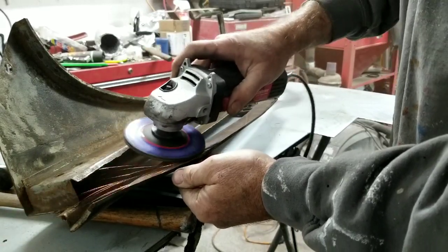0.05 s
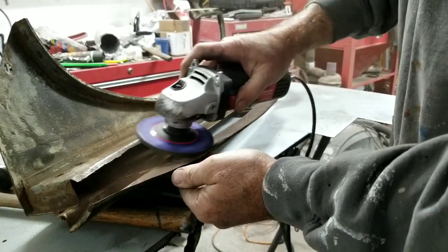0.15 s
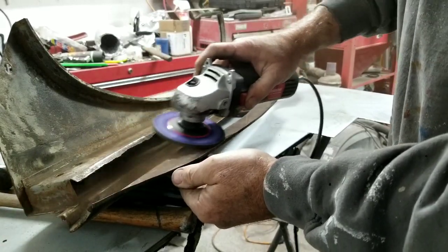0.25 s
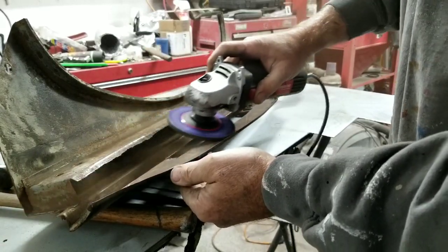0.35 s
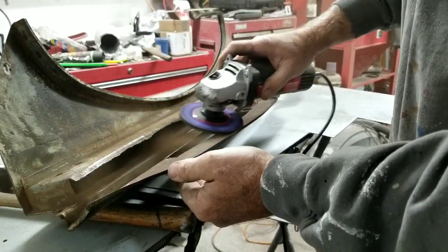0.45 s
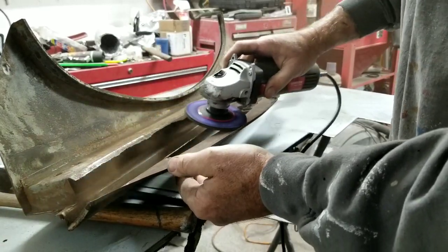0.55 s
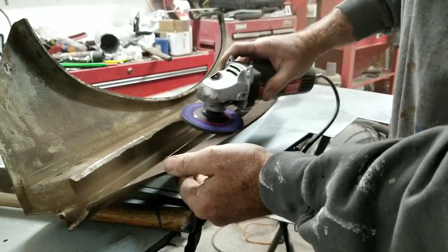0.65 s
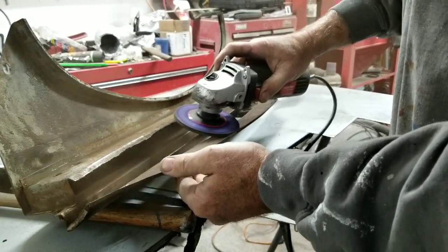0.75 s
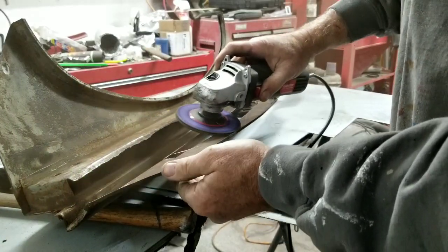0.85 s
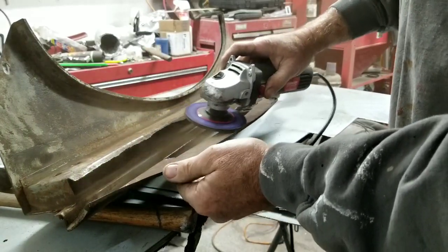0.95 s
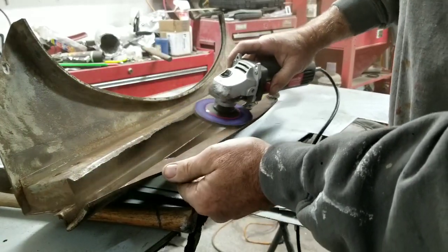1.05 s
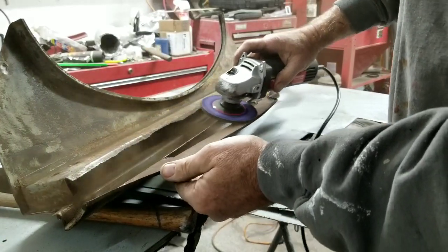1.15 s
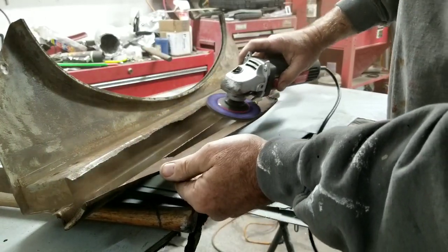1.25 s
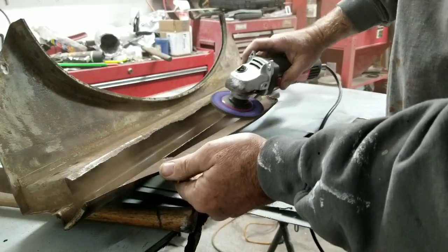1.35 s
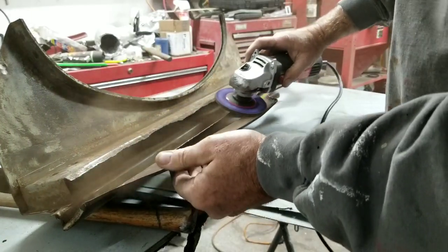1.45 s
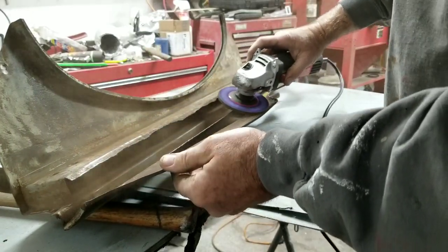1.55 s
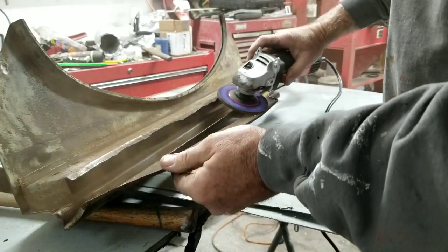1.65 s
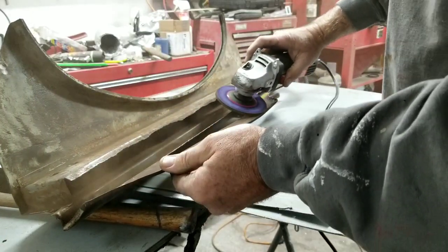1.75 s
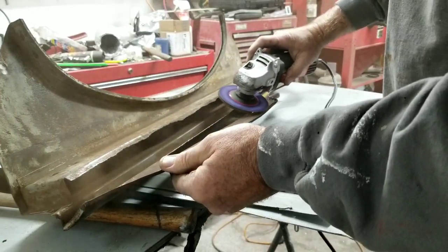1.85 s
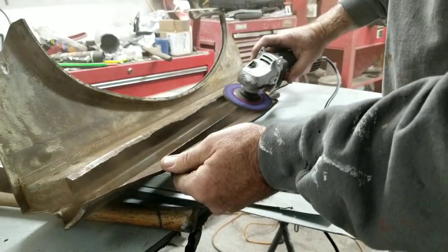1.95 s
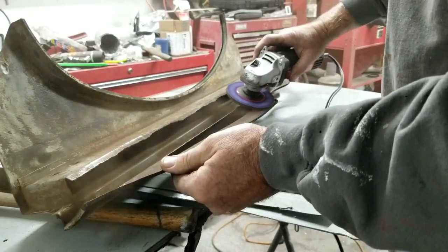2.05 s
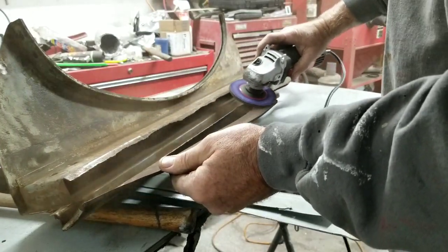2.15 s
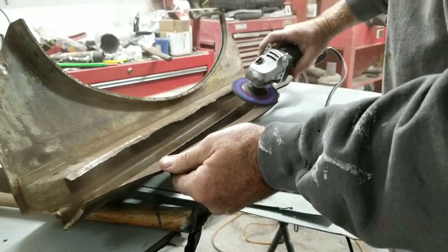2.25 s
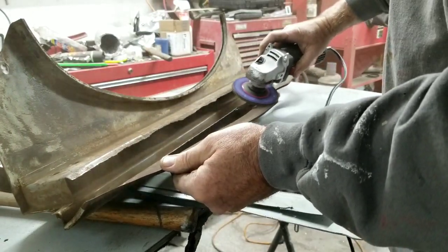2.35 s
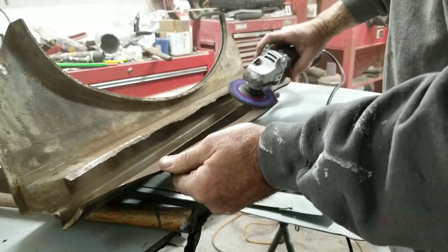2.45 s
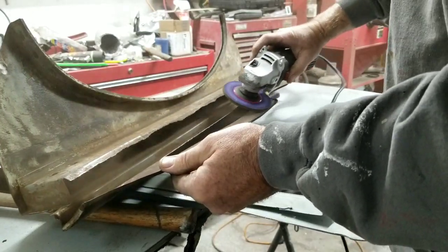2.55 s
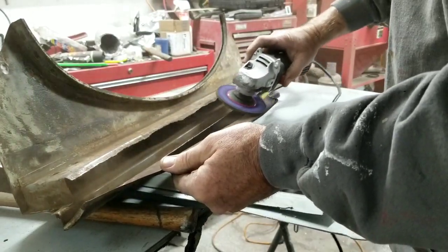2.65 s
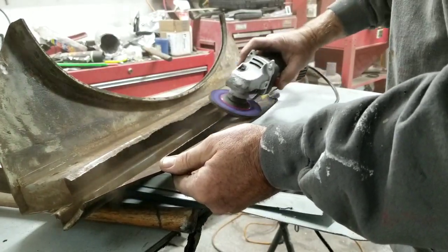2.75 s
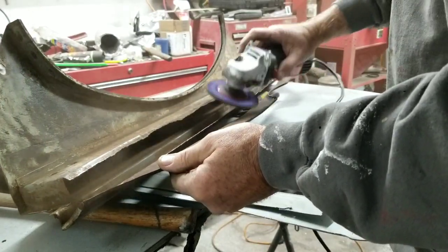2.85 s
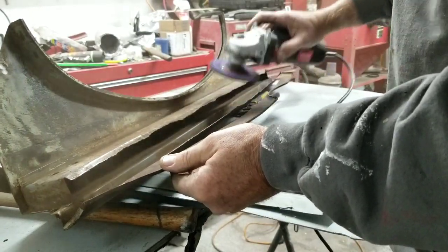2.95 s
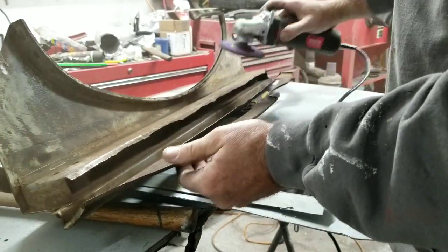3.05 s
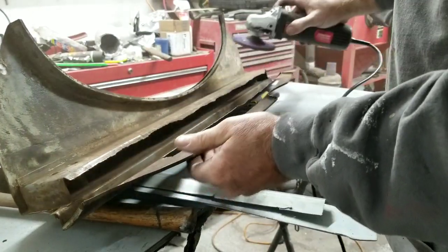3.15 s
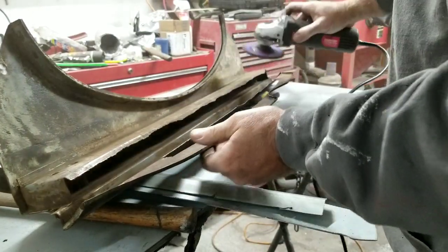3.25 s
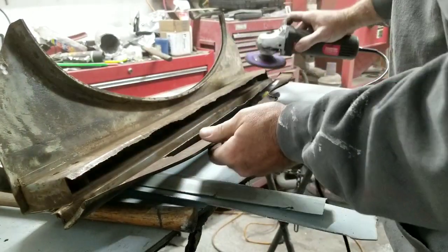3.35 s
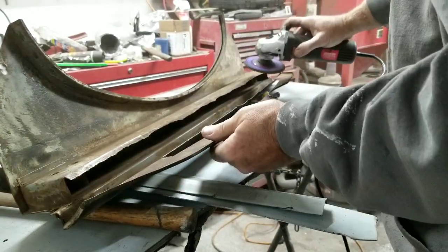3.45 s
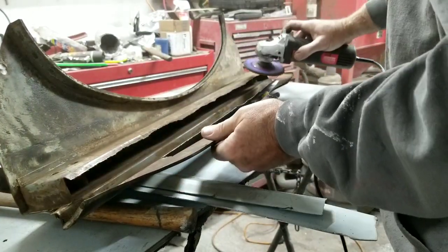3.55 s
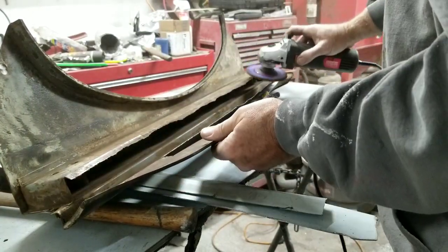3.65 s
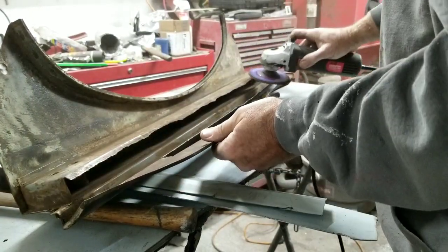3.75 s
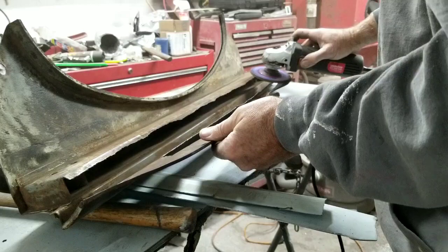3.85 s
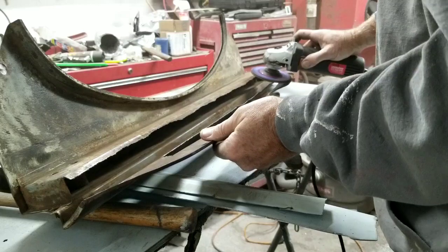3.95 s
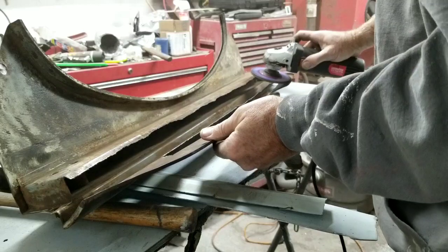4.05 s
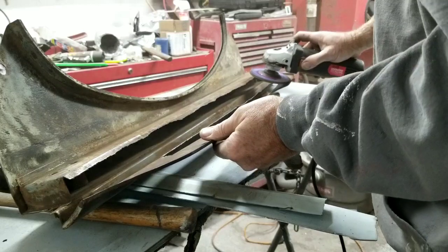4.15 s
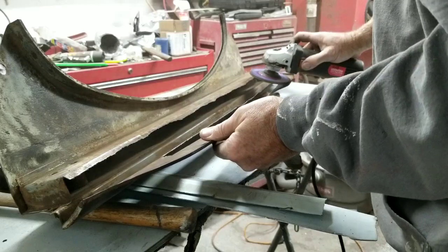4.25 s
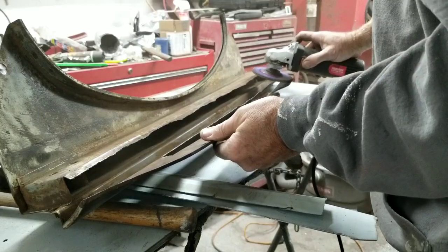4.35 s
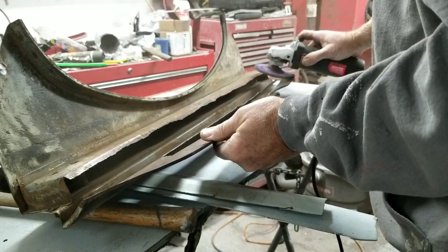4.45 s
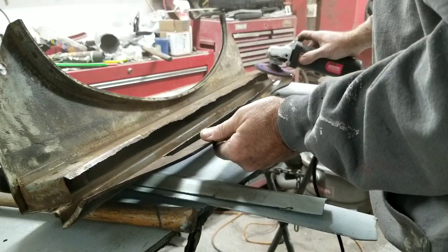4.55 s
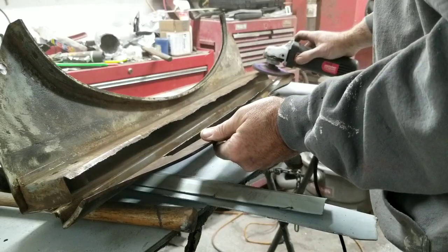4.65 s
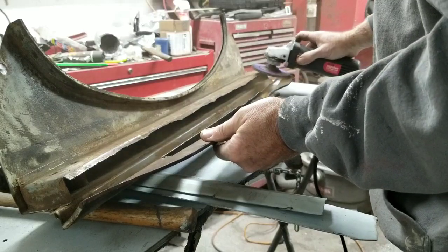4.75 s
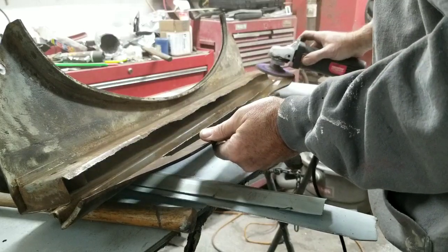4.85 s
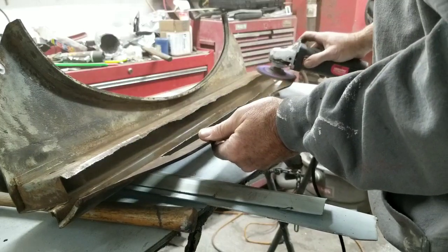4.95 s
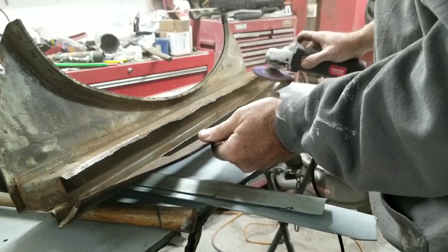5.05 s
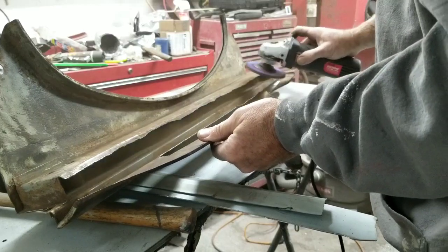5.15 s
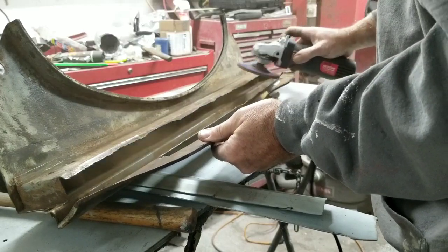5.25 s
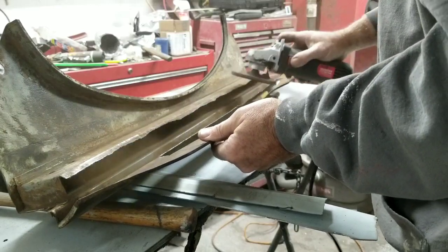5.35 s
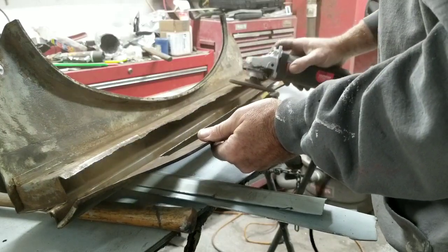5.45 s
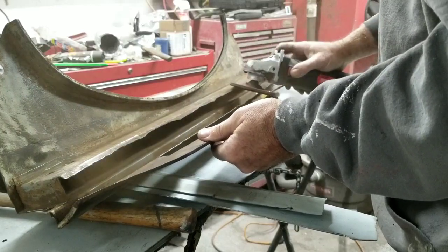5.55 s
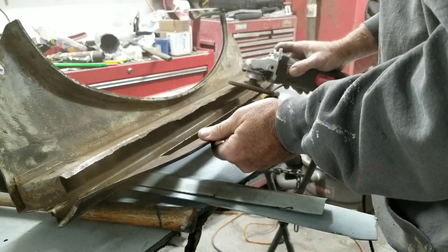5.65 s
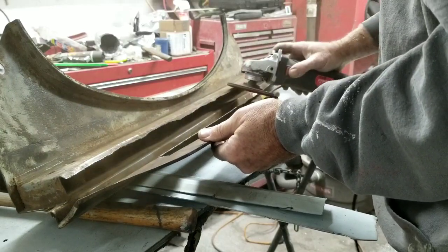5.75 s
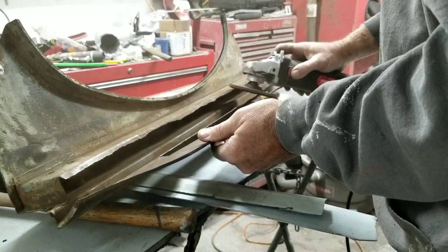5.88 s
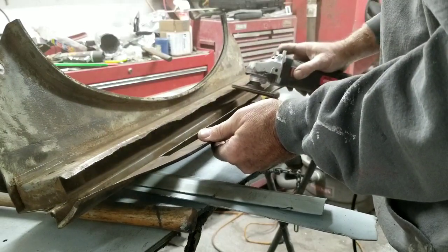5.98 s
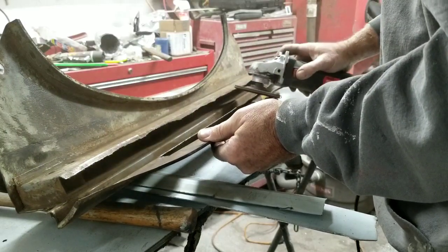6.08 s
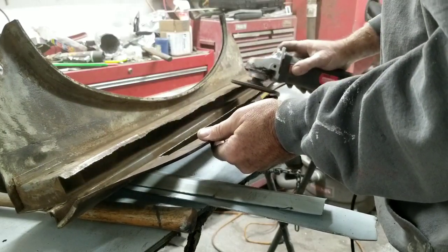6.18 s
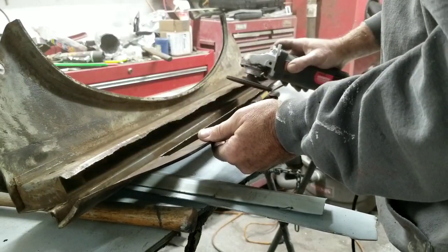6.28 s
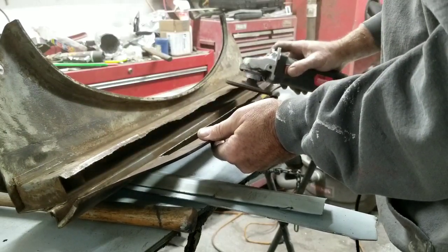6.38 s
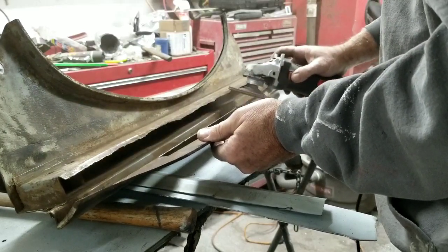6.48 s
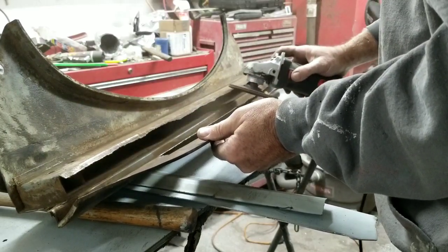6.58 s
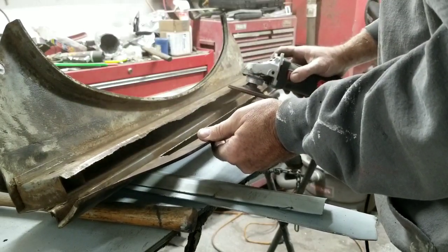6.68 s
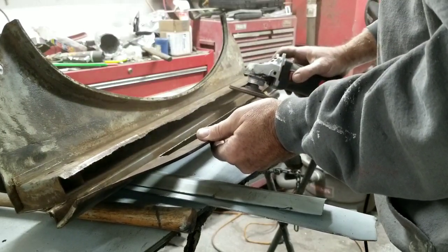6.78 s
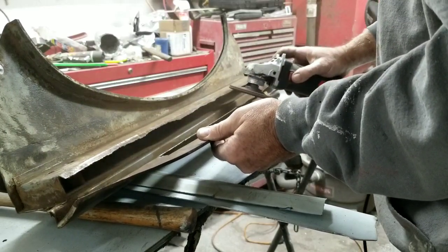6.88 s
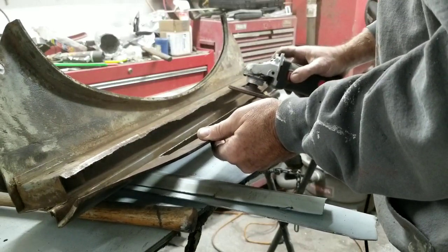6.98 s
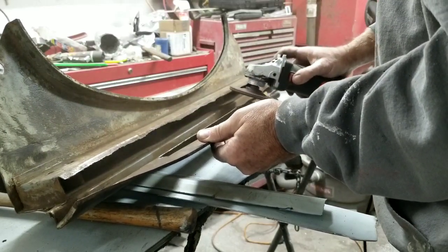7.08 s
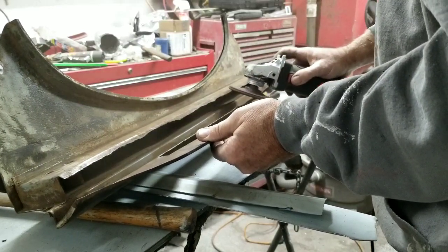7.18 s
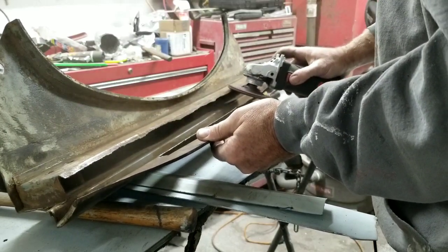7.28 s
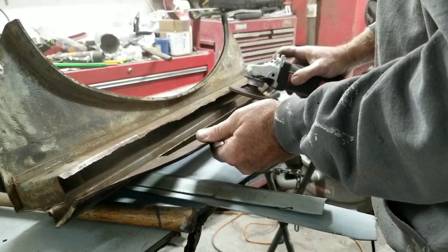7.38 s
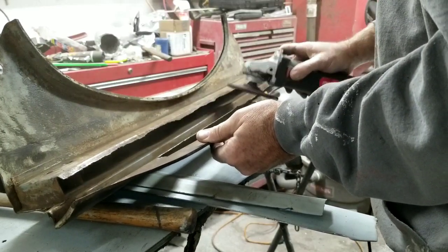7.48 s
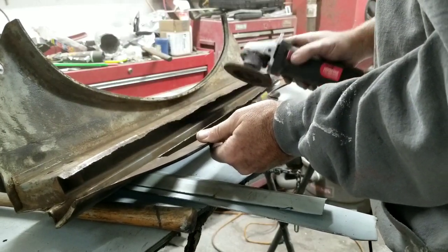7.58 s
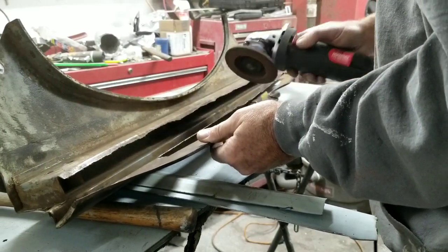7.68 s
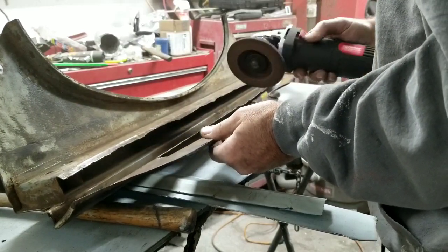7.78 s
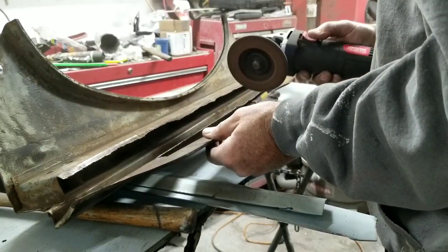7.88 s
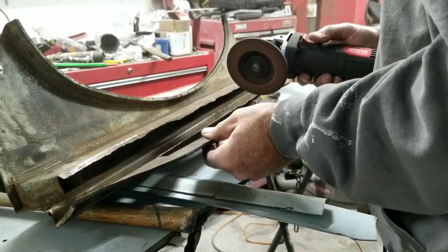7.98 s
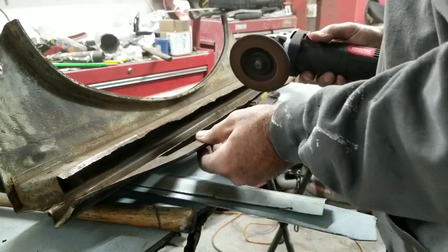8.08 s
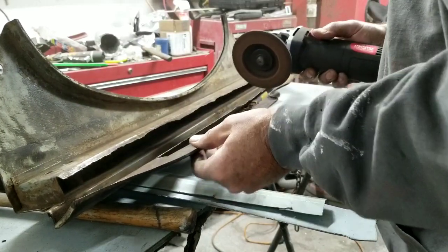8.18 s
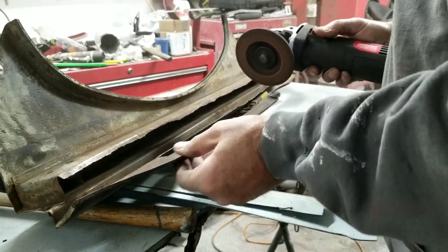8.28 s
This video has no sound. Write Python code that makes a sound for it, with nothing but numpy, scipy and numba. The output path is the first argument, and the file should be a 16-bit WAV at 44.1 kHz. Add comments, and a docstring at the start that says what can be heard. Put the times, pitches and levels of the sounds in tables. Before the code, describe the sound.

A corded angle grinder is already working on sheet steel at the start, close by in a workshop with a short echo. Its flap disc makes a harsh, bright, gritty screech over a motor whine and hissing air, while the sheet drones and thin ringing tones swell and fade. At about 2.9 seconds the disc lifts, and the free motor rises in pitch with a quieter hiss. Grinding returns from 3.8 to 5.2 seconds, dragging the pitch down. A brief touch comes at 5.6 seconds, and another runs from 5.8 to 6.3. The last pass, from 6.5 to 7.6 seconds, has several sharp flares of screeching as the disc bites. Then the motor is switched off and its whine falls, while the gears chatter in quick, irregular metallic ticks until the end at about 8.3 seconds.

```python
"""In a workshop, a corded angle grinder with a flap disc works along rusty sheet steel.
Each touch slows the motor, the grit screeches and the sheet drones and sings. The same grit comes
round on every turn, so the rubbing partly repeats. The spinning motor hums and its fan hisses.
Switched off, the motor runs down and the unloaded gears chatter. The room adds a short echo."""
import sys
import numpy as np
from scipy import signal
from scipy.fft import rfft, irfft, next_fast_len
from scipy.io import wavfile
from scipy.ndimage import uniform_filter1d, map_coordinates
from numba import njit

SR = 44100
rng = np.random.default_rng(int(sys.argv[2]) if len(sys.argv) > 2 else 0)


def digitize_waveform(pressure):
    """Quantize a signal to 16-bit integers and store it at the path in sys.argv[1].

    Rows of a 2-D input are taken as channels; values are limited to [-1, 1].
    """
    field = np.atleast_2d(pressure).T
    bounded = np.clip(field, -1, 1)
    quanta = np.round(bounded * 32767).astype(np.int16)
    wavfile.write(sys.argv[1], SR, quanta)


N = 366912
T = np.arange(N) / SR
FFT_SIZE = next_fast_len(N)
HZ = np.maximum(np.arange(FFT_SIZE // 2 + 1) * SR / FFT_SIZE, 1)


def grinding(rubbing):
    """The grit shakes the sheet: a screech and two drones follow the hand's pressure."""
    # the sheet's broad tone colour: (pitch [Hz], level [dB])
    colour = [(150, -58.5), (250, -54), (334, -63), (409, -15), (600, -26.5), (740, -33), (835, -17.5),
              (1260, -22.5), (1490, -19), (2520, -18), (3420, -22.5), (4810, -15), (7480, -16),
              (13300, -8.5), (14500, -11)]
    # ringing heard wherever the disc is: (pitch [Hz], width [Hz], level against the colour [dB])
    modes = [(9940, 310, -9), (10290, 53, 2.5), (10930, 150, -2), (11750, 96, -12), (14300, 700, 1),
             (13500, 110, 6)]
    ringing = np.sqrt(1 + peaks(modes) ** 2)
    sheet = stereo(rubbing, undb(over_hz(colour)) * ringing)
    sheet = rfft(patchy(sheet, slow_db=1.0, quick_db=3.8, own_db=2.6, bass_db=20), FFT_SIZE)
    low, high = 1 / (1 + (HZ / 3250) ** 16), 1 / (1 + (8200 / HZ) ** 16)
    bands = [unit(irfft(sheet * part, FFT_SIZE)[:, :N]) for part in (high, 1 - low - high, low)]
    hand_tremble = undb(np.outer((0.6, -0.55, 1.06), walk(24.8)))
    return sum(band * gain for band, gain in zip(bands, pressure() * hand_tremble))


def pressure():
    """Gains of screech, middle and low drone: the disc lands fast, presses and lifts more slowly."""
    # one list for each touch of the disc:
    # (time [s], screech [dB], middle drone against screech [dB], low drone against screech [dB])
    touches = [
        [(0, -18, -18, -19), (0.14, -23, -15.5, -21), (0.2, -19.5, -15, -20.5), (0.38, -17.5, -16, -19),
         (0.45, -20, -15.5, -20), (0.7, -21, -13.5, -21), (1.4, -20, -17, -21), (1.7, -24, -17.5, -26),
         (1.8, -21.5, -16, -20.5), (1.92, -23.5, -19.5, -22.5), (2.4, -20.5, -17, -24),
         (2.47, -21.5, -18.5, -20), (2.62, -21, -16.5, -21), (2.86, -22, -16, -19.5)],
        [(3.8, -27, -13, -13), (3.812, -20.5, -19.5, -21.5), (3.9, -25, -14, -14.5), (3.97, -22.5, -17.5, -17),
         (4.04, -21, -14, -13.5), (4.28, -19.5, -14, -18), (4.38, -21.5, -16.5, -17),
         (4.68, -21.5, -14.5, -18.5), (4.76, -24.5, -11, -18), (4.93, -22.5, -17, -19.5),
         (4.98, -23.5, -9.5, -9), (5.16, -23.5, -18.5, -19)],
        [(5.594, -19.5, -15.5, -19), (5.66, -20, -15, -26), (5.69, -24.5, -10.5, -18.5)],
        [(5.79, -19.5, -25, -28), (5.8, -20.5, -18, -21.5), (5.95, -23, -16, -21), (6.04, -27.5, -10.5, -19),
         (6.12, -23.5, -17.5, -15.5), (6.215, -23, -12.5, -21), (6.245, -26, -14, -13)],
        [(6.541, -18.5, -21.5, -26.5), (6.72, -24.5, -11.5, -15), (6.82, -22, -16.5, -22.5),
         (6.9, -22.5, -16.5, -20.5), (7.09, -25, -13.5, -19), (7.21, -23.5, -18.5, -20.5),
         (7.31, -22.5, -14.5, -19), (7.44, -24, -15, -18.5), (7.49, -22, -22.5, -27), (7.54, -19.5, -16, -20)],
    ]
    # the disc bites harder and the screech flares: (time [s], boost [dB])
    bites = [(0.75, 2), (2.39, 1), (2.69, 4), (4.694, 2), (5.026, 3), (6.748, 6), (6.88, 3), (7.02, 4),
             (7.157, 3.5), (7.247, 4.5)]
    land_db_per_s, lift_db_per_s, bite_s = 1808, 479, 0.029
    gains = np.zeros((3, N))
    for touch in touches:
        s, screech_db, middle_db, low_db = np.transpose(touch)
        edge_db = -land_db_per_s * np.maximum(s[0] - T, 0) - lift_db_per_s * np.maximum(T - s[-1], 0)
        for gain, db in zip(gains, (screech_db, screech_db + middle_db, screech_db + low_db)):
            gain += undb(np.interp(T, s, db) + edge_db)
    gains[0] *= undb(sum(db * np.exp(-((T - s) / bite_s) ** 2) for s, db in bites))
    return gains


def grit(smooth_hz):
    """Two rubbing spectra: some grit returns each turn; fresh grit throbs as the disc runs unevenly."""
    # rough steel makes the speed waver: (time [s], spread [share of speed])
    wobble = [(0, .001), (2.9, .001), (3.8, .003), (5.2, .004), (6.5, .007), (7.6, .007)]
    # returning grit against fresh grit: (pitch [Hz], level [dB])
    repeats = [(500, 16), (1500, 12), (2800, 9), (4500, 3), (8000, 2), (13000, -6)]
    carry_over, steady_share, multiples = .54, .28, 32
    disc_hz = smooth_hz * (1 + over_time(wobble) * walk(15))
    noise = rng.standard_normal((4, N))
    turns, lag = np.cumsum(disc_hz) / SR, SR / disc_hz
    # both the flaps and the track on the steel remember the last turn
    again = unit(np.array([repeat(repeat(x, lag, carry_over), lag, carry_over) for x in noise[:2]]))
    rim_band = HZ < multiples * disc_hz.min()
    rim = rfft(flaps(turns, disc_hz, multiples), FFT_SIZE)
    again = rfft(again, FFT_SIZE) * np.sqrt(1 - steady_share * rim_band) + np.sqrt(steady_share) * rim
    throb_db = 2.0 * np.sin(2 * np.pi * turns) + 0.84 * np.sin(4 * np.pi * turns + 2 * walk(11))
    # single flaps bite in bursts of a millisecond or two
    bite_db = 2.0 * unit(uniform_filter1d(rng.standard_normal(N), size=60))
    fresh = unit(noise[2:] * undb(throb_db + bite_db + 0.75 * walk(55)))
    share = 1 / (1 + undb(-over_hz(repeats)) ** 2)
    return np.sqrt(share) * again + np.sqrt(1 - share) * rfft(fresh, FFT_SIZE)


@njit
def repeat(x, lag, carry_over):
    """Feed the sound of one turn ago back in: the same grit meets the steel again."""
    y = np.zeros(len(x))
    for i in range(len(x)):
        at = i - lag[i]
        k = int(at)
        y[i] = x[i]
        if k > 0:
            y[i] += carry_over * (y[k] + (at - k) * (y[k + 1] - y[k]))
    return y


def flaps(turns, disc_hz, multiples):
    """The uneven rim strikes the same pattern every turn, making tones at multiples of the disc speed."""
    # how firmly the pattern holds: (time [s], level [dB])
    firmness = [(0, -3.5), (2.9, -8.5), (3.8, -3), (5.2, -9.5), (5.8, -1), (6.5, -25.5), (7.6, -18)]
    angle = np.arange(1024) / 1024
    orders, phases = np.arange(1, multiples + 1)[:, None], rng.random((2, multiples, 1))
    rims = np.sum(np.sin(2 * np.pi * (orders * angle + phases)), axis=1)
    tones = np.array([np.interp(turns, angle, rim, period=1) for rim in rims])
    return undb(over_time(firmness)) * 2 * np.sqrt(disc_hz / SR) * tones


def singing(rubbing):
    """One of the sheet's own notes swells while the disc rides its spot, then fades."""
    # the sheet's notes: (start [s], length [s], pitch [Hz], level [dB])
    notes = [(0.905, 0.49, 2333, -46.5), (1.238, 0.84, 2113, -50.5), (0.501, 0.63, 10050, -31.5),
             (1.29, 0.58, 9370, -43.5), (1.581, 0.12, 14300, -30), (2.054, 0.31, 1335, -51.5),
             (0.197, 0.66, 1095, -63), (1.05, 0.12, 1090, -47.5), (1.3, 0.44, 1067, -61),
             (2.05, 0.16, 1070, -49.5), (0.3, 0.55, 1474, -56), (4.01, 0.11, 2000, -44),
             (6.725, 0.12, 1725, -53.5), (7.004, 0.08, 1724, -59), (7.5, 0.08, 1720, -50),
             (2.326, 0.12, 11700, -32.5), (2.392, 0.48, 2480, -49), (2.514, 0.35, 2227, -43.5),
             (3.802, 0.1, 12840, -27), (4.105, 0.35, 1470, -48), (4.19, 0.14, 2815, -45),
             (4.398, 0.35, 10450, -41), (4.725, 0.25, 13900, -50), (4.732, 0.18, 10070, -35),
             (4.842, 0.25, 1550, -45), (6.101, 0.16, 13700, -50), (6.878, 0.58, 13580, -32.5)]
    drive, out = stereo(rubbing, 1), np.zeros((2, N))
    for s, length, hz, db in notes:
        span = slice(max(int((s - .03) * SR), 0), int((s + length + 0.045) * SR))
        width_hz = 50 + 0.006 * hz
        mode = signal.iirpeak(hz, hz / width_hz, SR)
        tone = unit(signal.lfilter(*mode, signal.lfilter(*mode, drive[:, span])))
        out[:, span] += undb(db) * tone * signal.windows.tukey(tone.shape[1], .6)
    return out


def low_notes(disc_hz):
    """Clean low tones at multiples of the disc speed come and go."""
    # a note at twice the disc speed: (start [s], length [s], level [dB])
    notes = [(0.493, 0.045, -57), (0.695, 0.052, -61), (0.843, 0.058, -58), (1.184, 0.062, -53),
             (1.34, 0.072, -60), (1.504, 0.054, -56), (1.78, 0.061, -57.5), (2.548, 0.036, -52),
             (2.926, 0.034, -65), (4.336, 0.053, -60), (4.422, 0.053, -47), (5.093, 0.14, -58.5),
             (5.467, 0.027, -61), (5.68, 0.082, -72), (6.028, 0.037, -62), (6.115, 0.045, -61),
             (6.202, 0.16, -65), (6.96, 0.055, -58), (7.153, 0.25, -65), (7.455, 0.03, -62),
             (7.53, 0.057, -72)]
    # tones that flicker during a touch: (multiple of disc speed, offset from the low drone [dB])
    flickers = [(4, -14), (5, -13), (6, -14), (8, -12), (10, -11)]
    angle = 2 * np.pi * np.cumsum(disc_hz) / SR
    swell = sum(undb(db) * np.exp(-((T - s - length / 2) / (length / 2)) ** 6) for s, length, db in notes)
    out = swell * undb(5.6 * walk(25)) * np.sin(2 * angle + walk(12))
    drone = pressure()[2]
    for order, db in flickers:
        flicker_db = 15 * (np.tanh(3 * walk(16)) - 1.5)
        out += drone * undb(db + flicker_db) * np.sin(order * angle + walk(5))
    return np.sqrt(2) * out


def motor(hz):
    """The off-balance rotor hums; odd multiples whine, the seventh most when the housing rings along."""
    # heard level of the hum and whine; at moments the hum is briefly lost: (time [s], hum [dB], whine at five
    # times the speed [dB])
    levels = [(0, -60, -69), (0.45, -55, -62), (0.63, -64, -76), (0.8, -48, -60), (0.93, -56, -61),
              (1.2, -54.5, -49), (1.8, -58, -65), (2.4, -55.5, -75), (2.85, -54, -60), (3.2, -42.5, -59),
              (3.5, -48.5, -48), (3.8, -54, -48.5), (4.2, -54, -53), (4.45, -52.5, -56), (4.65, -69, -62),
              (4.8, -111, -66), (4.97, -49, -48), (5.15, -73, -54), (5.4, -45, -61.5), (5.57, -61, -41.5),
              (5.7, -59.5, -65), (6.2, -60.5, -62), (6.4, -54.5, -49.5), (6.6, -58, -56), (7.0, -58, -62),
              (7.4, -61.5, -70), (7.7, -56.5, -65), (8.32, -64, -75)]
    housing_hz, housing_width_hz = 3253, 87
    s, *columns = np.transpose(levels)
    hum_db, whine_db = (np.interp(T, s, column) for column in columns)
    turns, out = np.cumsum(hz) / SR, np.zeros((2, N))
    housing_db = -10 * np.log10(1 + (2 * (7 * hz - housing_hz) / housing_width_hz) ** 2)
    for order, db in ((1, hum_db), (3, hum_db - 16), (5, whine_db), (7, hum_db - 4 + housing_db)):
        waver_db, drift = 1.7 * walk(22), .45 * walk(14)
        for side in out:
            gain = undb(db + waver_db + 1.2 * walk(9))
            side += gain * np.sin(2 * np.pi * order * turns + drift + .4 * walk(5))
    return np.sqrt(2) * out


def fan():
    """Cooling air hisses, fainter while the disc cuts; its colour changes as the tool is turned over."""
    # the air before grinding dims it: (time [s], level [dB])
    levels = [(0, -19.5), (2.85, -34.5), (3.0, -35), (3.15, -31.5), (3.75, -32.5), (5.25, -37), (5.55, -32),
              (5.75, -34.5), (6.3, -37.5), (6.5, -34), (7.62, -37.5), (7.75, -37), (8.32, -37)]
    # the air's colour in the working position: (pitch [Hz], level [dB])
    working_air = [(290, -46), (400, -9), (500, -8.5), (650, -11), (870, -5), (1200, -10.5), (1370, -5),
                   (1650, -6), (2100, -5.5), (2600, -0.5), (2950, -2.5), (3250, -2.5), (3450, -8),
                   (4200, -4.5), (6300, -6), (7400, -8), (10500, -4), (13100, -0.5), (14500, -3)]
    # its colour with the disc's open side facing out: (pitch [Hz], level [dB])
    turned_air = [(290, -50), (500, -43), (663, -8), (1180, -21), (1420, -6), (2160, -10), (2490, -1),
                  (4500, -2.5), (5260, -5), (7800, -7), (9240, -8.5), (11300, -3), (14500, -5.5)]
    turned = np.interp(T, (7.63, 7.8), (0, 1))
    air = np.sqrt(1 - turned) * hiss(undb(over_hz(working_air)))
    air += np.sqrt(turned) * hiss(undb(over_hz(turned_air)))
    air = unit(patchy(air, slow_db=.4, quick_db=1.5, own_db=.5))
    recede = 1 / np.hypot(1, pressure()[0] / undb(-36))
    return air * recede * undb(over_time(levels) + walk(14))


def gear_chatter():
    """Loose gear teeth knock: each knock is a short crack inside a longer, ticking shake of the gearbox."""
    # tooth knocks: (time [s], level [dB], extra gain of the crack [dB])
    knocks = [(7.6357, -27, -10), (7.681, -27.5, -11), (7.7303, -27, -7), (7.785, -21.5, -4),
              (7.8215, -26, -6), (7.84, -22.5, -10), (7.8808, -27.5, -8), (7.9209, -19, -16),
              (7.967, -27.5, 0), (7.993, -24, -6), (8.0312, -21, -10), (8.0726, -23, 3), (8.1145, -24, -9),
              (8.158, -23, -11), (8.201, -25, -2), (8.2142, -35, 1), (8.2404, -25.5, -2), (8.283, -22.5, 1),
              (8.3145, -20, 0)]
    # the gearbox's ringing: (pitch [Hz], width [Hz], level [dB])
    gearbox = [(3740, 680, -3.5), (4540, 180, 1.5), (6300, 550, -3.5), (11200, 480, 5), (13200, 1500, -2.5)]
    crack_s, shake_s = .0016, .011
    ticks = unit(undb(2.5 * unit(uniform_filter1d(rng.standard_normal(N), size=120))))
    shape = np.zeros(N)
    for s, db, crack_db in knocks:
        since = T - s
        crack = (since > 0) * np.exp(-abs(since) / crack_s)
        shake = np.exp(-((since - .005) / shake_s) ** 2) * ticks
        shape += undb(db - 6) * (undb(crack_db) * crack + undb(-7) * shake)
    return shape * hiss(peaks(gearbox) / (1 + (900 / HZ) ** 2))


def thumps():
    """Faint, short, dull low thumps."""
    # soft low thumps: (time [s], level [dB])
    soft_thumps = [(3.79, -58), (5.59, -55), (5.795, -62), (6.54, -63), (7.78, -66), (7.967, -65),
                   (8.13, -66)]
    half_length_s, corner_hz = 0.023, 201
    shape = sum(undb(db) * np.exp(-((T - s) / half_length_s) ** 2) for s, db in soft_thumps)
    return shape * hiss(1 / (1 + (HZ / corner_hz) ** 4))


def room_echo(dry, fade_s=.3, level_db=-15):
    """The workshop's walls return a short wash, duller than the direct sound."""
    t = T[:SR // 2]
    tail = rng.standard_normal((2, len(t))) * 1000 ** (-t / fade_s) * (t > .006)
    tail = signal.lfilter([1], [1, -.3], tail)
    tail *= undb(level_db) / np.sqrt(np.sum(tail ** 2, axis=1, keepdims=True))
    return signal.fftconvolve(dry, tail, axes=1)[:, :N]


def thin_bass(x, dip_db=-22):
    """The bass drops away for brief moments."""
    # dips in the bass: (time [s], half length [s], upper edge [Hz])
    dips = [(0.095, .1, 744), (0.403, 0.091, 755), (0.655, .09, 736), (2.145, 0.086, 736), (2.5, 0.14, 610),
            (3.92, 0.054, 750), (4.208, 0.047, 730), (4.672, 0.042, 980), (4.72, 0.3, 695),
            (5.918, 0.064, 735), (7.07, .1, 760)]
    hz, s, spectrum = signal.stft(x, SR, nperseg=1024)
    depth = sum(np.outer(1 / (1 + (hz / edge) ** 8), np.exp(-((s - at) / half) ** 4))
                for at, half, edge in dips)
    return signal.istft(spectrum * undb(dip_db * depth), nperseg=1024)[1][:, :N]


def patchy(x, slow_db, quick_db, own_db, bass_db=0):
    """Narrow bands of the sound swell, flicker, drop out and shift between the ears."""
    hz, _, spectrum = signal.stft(x, SR, nperseg=1024)
    def patches(bins, frames, channels):
        cells = rng.standard_normal((channels, *spectrum.shape[1:]))
        for _ in range(2):
            cells = uniform_filter1d(uniform_filter1d(cells, bins, axis=1), frames, axis=2)
        return unit(cells)
    db = slow_db * patches(3, 14, 1) + quick_db * patches(2, 3, 1) + own_db * patches(3, 8, 2)
    # no band swells far above the rest, and the low bands can drop out more deeply
    db = 7 * np.tanh(np.maximum(db, 0) / 7) + np.minimum(db, 0)
    db -= bass_db * np.maximum(patches(3, 5, 1), 0) / (1 + (hz[:, None] / 900) ** 4)
    # short waves reach the two sides out of step
    spectrum[0] *= np.exp(2j * np.minimum(hz / 1500, 1)[:, None] * patches(8, 60, 1)[0])
    return signal.istft(spectrum * undb(db), nperseg=1024)[1][:, :N]


def stereo(pair, gain):
    """Turn two unrelated spectra into left and right sounds that are partly alike."""
    # how alike the sides are: (pitch [Hz], likeness [0 to 1])
    likeness = [(300, 1), (640, 0.53), (1400, 0.89), (3000, 1), (10000, 0.27)]
    # how the sound leans: (pitch [Hz], left minus right [dB])
    balance = [(500, -1), (1200, 2), (2400, 0), (4400, 3), (14000, 3)]
    alike, lean = over_hz(likeness), undb(over_hz(balance) / 2)
    left = alike * pair[0] + np.sqrt(1 - alike ** 2) * pair[1]
    return irfft(gain * np.array([left * lean, pair[0] / lean]), FFT_SIZE)[:, :N]


def hiss(gain):
    """Stereo noise of a given colour."""
    return unit(stereo(rfft(rng.standard_normal((2, N)), FFT_SIZE), gain))


def peaks(modes):
    """Gain curve of ringing peaks: (pitch [Hz], width [Hz], level [dB])."""
    return np.sqrt(sum(undb(db) ** 2 / (1 + (2 * (HZ - hz) / width) ** 2) for hz, width, db in modes))


def walk(rate):
    """Random values every 1 / rate seconds, joined smoothly; spread near 1."""
    knots = rng.standard_normal(int(N / SR * 60) + 2)
    return map_coordinates(knots, [T[::64] * rate], order=3).repeat(64)[:N]


def over_hz(points):
    """Join (pitch [Hz], value) points, with octaves evenly spaced."""
    hz, value = np.transpose(points)
    return np.interp(np.log(HZ), np.log(hz), value)


def over_time(points):
    """Join (time [s], value) points with straight lines."""
    return np.interp(T, *np.transpose(points))


def undb(db):
    """Turn decibels into a gain."""
    return 10 ** (np.asarray(db) / 20)


def unit(x):
    """Scale to an average strength (rms) of 1."""
    return x / np.sqrt(np.mean(x ** 2))


def scene():
    """The motor turns the disc through gears; disc, sheet, fan and gears sound together in the room."""
    # the motor sags under load, recovers and finally runs down: (time [s], speed [turns per s])
    speed = [(0, 403), (0.2, 415), (0.5, 412), (0.92, 422), (1.2, 412), (1.55, 402), (2.0, 416), (2.2, 412),
             (2.87, 423), (3.1, 447), (3.45, 467), (3.85, 479), (4.2, 453), (4.5, 445), (4.75, 432),
             (5.16, 421), (5.4, 446), (5.59, 460), (5.7, 458), (5.9, 466), (6.25, 452), (6.55, 469),
             (6.9, 447), (7.4, 427), (7.6, 424), (7.75, 416), (8.1, 364), (8.32, 332)]
    gear_ratio = 37 / 12
    motor_hz = uniform_filter1d(over_time(speed), size=SR // 20)
    disc_hz = motor_hz / gear_ratio
    rubbing = grit(disc_hz)
    dry = motor(motor_hz) + thin_bass(fan() + grinding(rubbing) + low_notes(disc_hz))
    dry += singing(rubbing) + gear_chatter() + thumps()
    return dry + room_echo(dry)


def record(dry, low_hz=183, top_hz=14520):
    """Cut away the deep bass and the highest treble."""
    no_bass = signal.sosfilt(signal.butter(4, low_hz, "high", fs=SR, output="sos"), dry)
    return signal.sosfilt(signal.ellip(16, .5, 80, top_hz, fs=SR, output="sos"), no_bass)


dry = scene()
out = record(dry)
digitize_waveform(out)
```